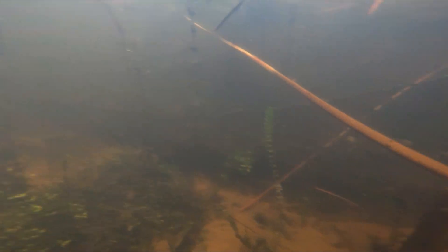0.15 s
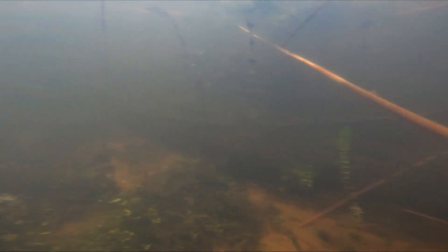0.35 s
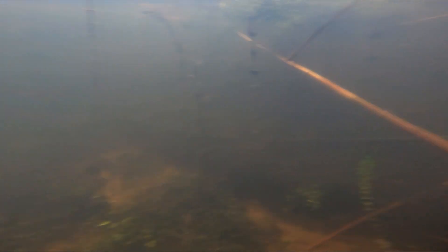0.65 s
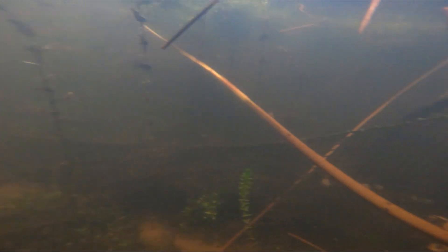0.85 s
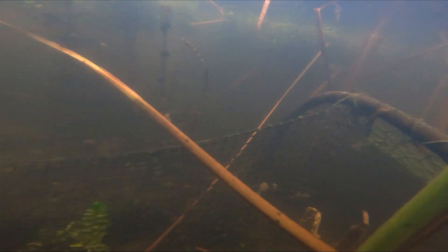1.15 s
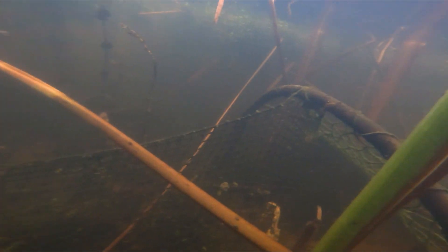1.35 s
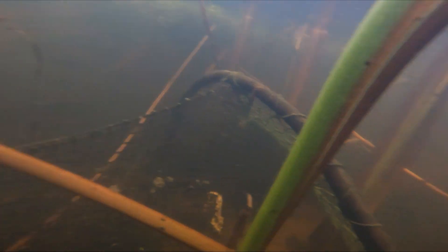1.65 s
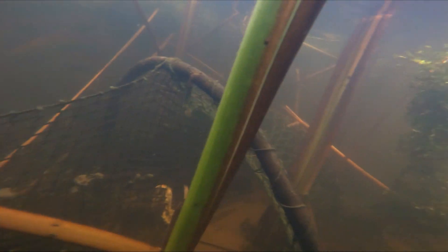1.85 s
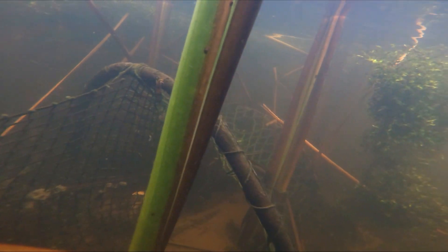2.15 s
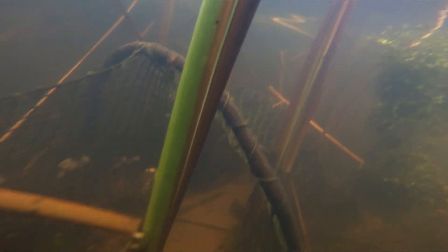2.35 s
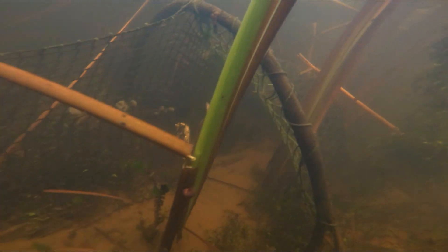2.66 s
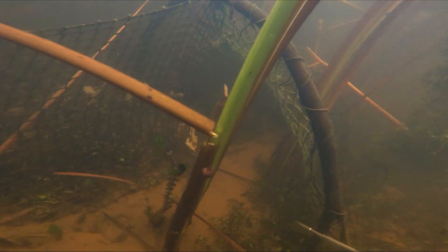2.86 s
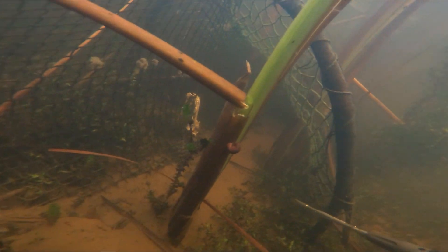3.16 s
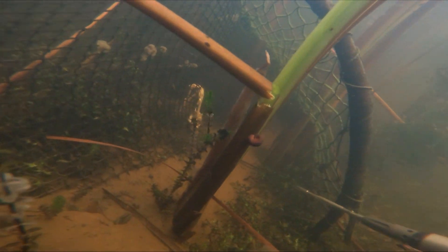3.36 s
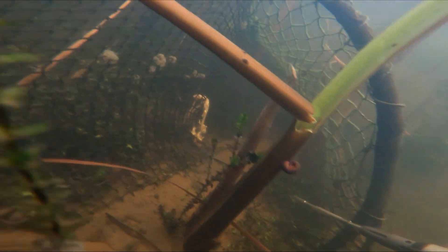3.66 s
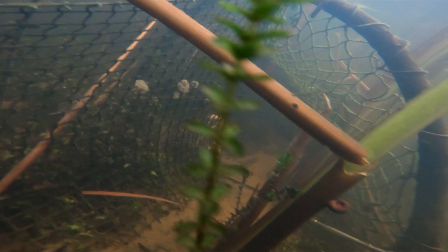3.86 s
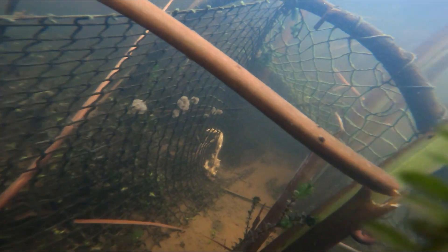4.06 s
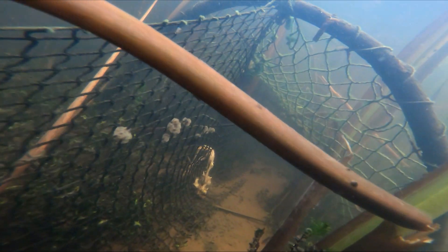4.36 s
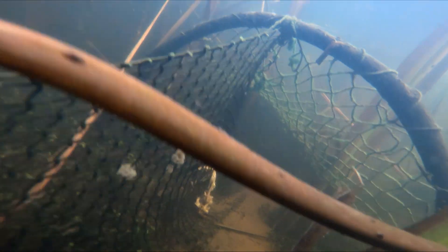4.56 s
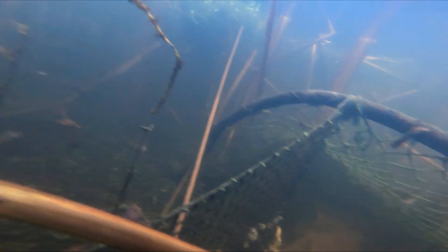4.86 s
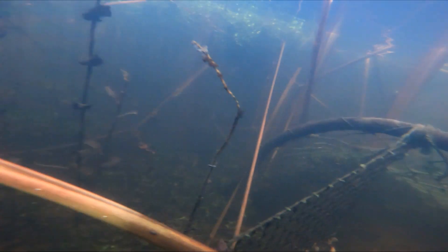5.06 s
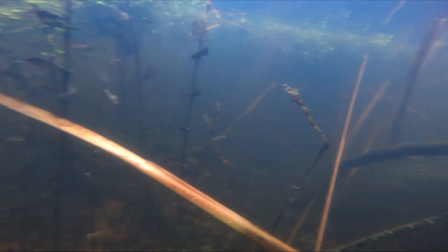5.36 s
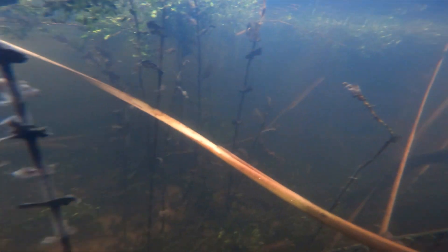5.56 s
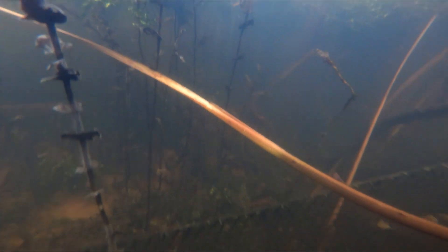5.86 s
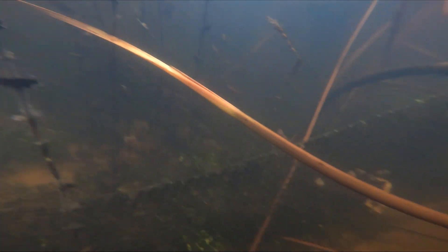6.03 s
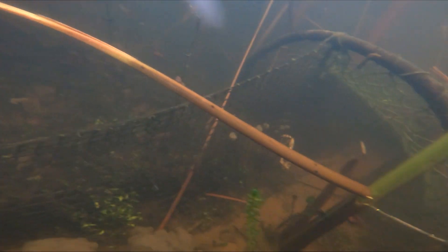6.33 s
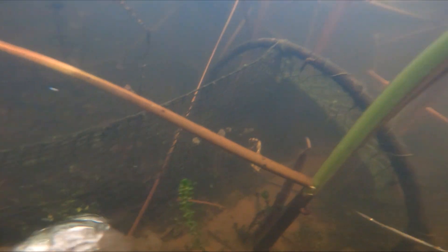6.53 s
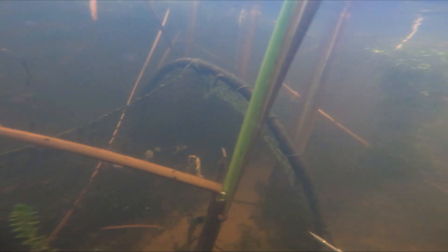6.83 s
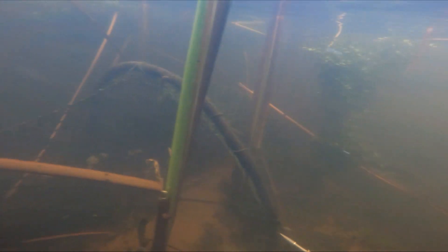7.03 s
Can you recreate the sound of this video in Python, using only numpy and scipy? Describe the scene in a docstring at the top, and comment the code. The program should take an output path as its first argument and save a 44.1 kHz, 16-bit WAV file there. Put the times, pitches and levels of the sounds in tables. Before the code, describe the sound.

Underwater, reeds knock dully and scrape against a sealed camera case while small bubbles ping and shallow water murmurs softly.

```python
"""Stems knock and scrape on a sealed camera housing as a diver carries it through reeds and branches.
The housing rings dully under each blow, and a dragged stem sticks and slips across it.
Around it, bubbles ping and gurgle while the shallow water hisses, heaves and murmurs.
Both microphones sit inside and hear the walls flex, in step in the bass, opposed near 1 kHz."""
import sys
import numpy as np
from scipy import signal
from scipy.fft import rfft, irfft, next_fast_len
from scipy.io import wavfile

SR = 44100
rng = np.random.default_rng(int(sys.argv[2]) if len(sys.argv) > 2 else 0)


def bounce(signal):
    """Save signal as a 16-bit WAV file at the path given by the first command-line argument."""
    frames = np.transpose(np.atleast_2d(signal))
    limited = np.clip(frames, -1, 1)
    pcm = np.round(limited * 32767).astype(np.int16)
    wavfile.write(sys.argv[1], SR, pcm)


N = 317079
TIME = np.arange(N) / SR
WALL_HZ = 3290   # the wall muffles what lies above

# The housing's modes. Each row: pitch in Hz, width in Hz, gain in dB under blows, gain in dB under flow.
HOUSING_MODES = [(608, 420, -7.5, -26.5), (724, 46.6, 6.5, -3), (1039, 126, 7, -9.5), (1310, 186, 6, 1),
                 (1780, 198, -4, -0.5), (2460, 240, -38, -17.5), (2920, 300, -18, -14),
                 (5210, 600, -46, -18), (7280, 480, -42, -27.5), (9600, 400, -65, -38.5)]
# Phase between the microphones. Each row: frequency in Hz, lead of the left in radians.
WALL_PHASE = [(0, -.2), (200, -.2), (480, -.4), (600, -.9), (700, -1.9), (800, -2.8), (900, -3.7),
              (1300, -4.0), (1650, -1.6), (2000, -.8), (2300, .3), (2900, 1.8), (3400, 1.5)]
# The side the walls favour. Each row: frequency in Hz, left over right in dB.
WALL_BALANCE = [(450, 0), (620, 5.5), (800, -10), (1050, -2), (1400, 7), (1700, -2.5), (2900, 0.5),
                (4000, 1)]
# Microphone noise. Each row: frequency in Hz, relative density in dB.
MIC_NOISE_SPECTRUM = [(50, -20.5), (105, -15), (170, -2), (260, -10), (450, -23), (1000, -13.5),
                      (2000, -22), (3200, -29.5), (4200, -34.5), (6000, -35), (10000, -41), (12000, -55.5),
                      (15500, -69)]
# Water streaming past. Each row: time in seconds, hiss level in dB, fizz level in dB.
STREAM_LEVELS = [(0, -68.5, -80.5), (.17, -62.5, -74.5), (.35, -66.5, -87), (1.4, -65, -91),
                 (2.4, -63, -82), (3.6, -62.5, -87), (4.05, -60.5, -79.5), (4.6, -62.5, -80),
                 (5.8, -61, -82.5), (6.45, -68, -92.5), (6.9, -63.5, -86.5), (7.19, -57, -78)]
# The murmur's tone. Each row: pitch in Hz, width in Hz, gain in dB.
MURMUR_MODES = [(158.8, 26.6, -0.5), (220, 56.6, 3.5), (273, 192, -3)]
# The murmur's fader. Each row: time in seconds, level in dB.
MURMUR_LEVELS = [(0, -66), (.85, -57), (1.4, -61), (1.5, -91), (2.6, -57.5), (3.6, -82.5), (4.05, -70),
                 (4.6, -87), (4.75, -65), (5.2, -66), (5.8, -59), (6.45, -66), (6.9, -55), (7.19, -58)]
# Slow surges of water. Each row: crest time in seconds, level in dB, half length in seconds.
WATER_SURGES = [(0, -54.5, 0.25), (0.834, -49, .45), (1.851, -48.5, 0.41), (2.745, -49, 0.31),
                (3.234, -52, 0.16), (3.941, -58, 1), (4.489, -66, 0.21), (4.826, -41.5, 0.16),
                (5.38, -32.5, 0.08), (5.551, -50, 0.41), (5.94, -56, 0.3), (6.645, -57, 0.46),
                (7.02, -39.5, .08)]
# Bubble clouds. Each row: crest time in seconds, level in dB, fade in dB per second.
BUBBLE_CLOUDS = [(1.347, -51.5, 311), (2.45, -50.5, 298), (2.56, -31, 522), (2.668, -29.5, 267),
                 (2.75, -57, 51.5), (5.79, -76.5, 16.5), (6.058, -61, 100.5)]
# Single bubbles. Each row: start in seconds, level in dB, pitch in Hz, seconds to fade by 60 dB.
BUBBLE_PINGS = [(0.639, -62, 2220, 0.055), (1.009, -49, 1840, 0.056), (1.055, -48, 1720, 0.041),
                (1.116, -58, 3210, 0.026), (1.385, -63, 421, 0.32), (1.62, -45, 1210, 0.059),
                (1.876, -43.5, 414, 0.16), (2.017, -61, 380.5, 0.68), (2.124, -48.5, 405, 0.18),
                (2.15, -49, 3210, 0.019), (2.182, -58, 403, 0.26), (2.239, -40, 1774, 0.027),
                (2.239, -59.5, 870, 0.22), (2.4, -46.5, 414, 0.085), (2.664, -16.5, 650.7, .11),
                (2.718, -34, 1177, 0.15), (2.747, -36, 1780, 0.012), (2.748, -41.5, 403, 0.22),
                (2.813, -51, 1244, 0.18), (2.928, -58, 3100, .03), (2.97, -58.5, 587, 0.25),
                (3.31, -39.5, 1310, 0.078), (3.312, -41.5, 1583, 0.039), (3.936, -43, 1955, 0.046),
                (3.87, -60.5, 793, 0.21), (3.94, -56, 567, 0.2), (4.025, -50, 2510, 0.032),
                (4.084, -44.5, 2240, 0.034), (4.1, -55.5, 765, 0.059), (4.091, -55, 321, 0.14),
                (4.22, -64, 697, 0.23), (4.474, -52, 1440, 0.12), (4.473, -54.5, 775, 0.18),
                (4.559, -65.5, 356, 0.11), (4.981, -46, 2730, .018), (5.346, -29.5, 583, 0.15),
                (5.576, -25.5, 622, 0.049), (5.642, -27.5, 623, 0.064), (5.702, -25.5, 600, 0.13),
                (5.906, -40.5, 694, 0.16), (5.936, -43, 1100, 0.29), (5.976, -45.5, 577, 0.19),
                (5.976, -38.5, 976, 0.29), (5.985, -44, 2020, 0.034), (6.126, -11.5, 1876, 0.058),
                (6.129, -49, 268.8, 0.57), (6.13, -43, 727, .14), (6.43, -57.5, 837, 0.096),
                (6.556, -41, 930, 0.11), (6.622, -37.5, 876, 0.11), (6.648, -48, 253.7, 0.88),
                (6.83, -56, 677, 0.29), (6.977, -34, 1220, 0.1), (7.0, -37.5, 1676, 0.063),
                (7.003, -33, 2920, 0.047), (7.037, -44.5, 1955, 0.076), (7.062, -41.5, 1900, .013),
                (7.095, -51, 3290, .02), (7.129, -39.5, 1760, 0.063), (7.134, -36, 2615, 0.028)]
# Where single bubbles are panned. Each row: pitch in Hz, left over right in dB.
BUBBLE_PAN = [(400, -1.5), (620, 0.5), (740, -8.5), (950, 6), (1200, -1), (1500, 15.5), (1900, -1),
              (2900, 5)]
# Soft bumps. Each row: start in seconds, level in dB, pitch in Hz, seconds to fade by 60 dB.
BODY_BUMPS = [(0.047, -46.5, 250, 0.017), (0.079, -45.5, 312, 0.03), (0.825, -44.5, 244, 0.11),
              (0.832, -49.5, 96.3, 0.18), (2.569, -39, 147.3, .15), (2.666, -25, 217, 0.022),
              (3.099, -42, 154.5, 0.043), (3.433, -54, 195, .05), (3.741, -42, 112.6, 0.019),
              (3.934, -48.5, 240, 0.018), (5.016, -41.5, 207.6, .073), (5.057, -43, 201, 0.076),
              (5.297, -15, 140.7, 0.062), (5.301, -15, 206, 0.068), (5.31, -15, 64.8, 0.083),
              (5.345, -24, 131.4, 0.085), (5.405, -21, 57.1, 0.17), (5.456, -22, 183.6, 0.025),
              (5.578, -33, 234, 0.013), (5.937, -45, 273.4, 0.2), (6.972, -36.5, 135, 0.09),
              (6.975, -32, 244, .1), (6.977, -33, 51.9, .11)]
# Tiny snaps. Each row: start in seconds, level in dB, pitch in Hz.
BRIGHT_SNAPS = [(0.7795, -49, 5150), (1.344, -53, 5320), (1.8745, -35, 5520), (1.8834, -34, 6700),
                (2.316, -64, 7300), (2.38, -62.5, 7540), (3.269, -50, 7460), (3.284, -64, 7500),
                (3.397, -55, 9660), (3.41, -61, 8150), (3.4361, -49.5, 5540), (3.474, -50, 5260),
                (3.763, -47.5, 5540), (3.7949, -48.5, 4880), (3.8503, -45, 5700), (3.8776, -57, 6060),
                (3.8943, -41.5, 5530), (3.932, -58, 6600), (4.248, -53.5, 6150), (4.995, -50, 5030),
                (5.232, -56, 8240), (5.3, -39, 3450), (5.3867, -34.5, 7500), (5.391, -24.5, 12300),
                (5.4107, -38.5, 8460), (5.489, -50, 5350), (5.548, -54, 5360), (5.8601, -66, 5100),
                (6.0077, -58, 5070), (6.066, -48, 11070), (6.0746, -49, 5140), (7.0344, -52, 7100),
                (7.0734, -58, 5400)]
# The singing rub's fader. Each row: time in seconds, level in dB.
RUB_LEVELS = [(6.55, -72), (6.598, -50.5), (6.794, -47.5), (7.19, -50)]
# The tones it sings. Each row: pitch in Hz, width in Hz, gain in dB.
RUB_MODES = [(258, 15, -0.5), (671, 40, -7), (842, 270, -13), (1070, 167, -8.5), (1320, 29, -4.5),
             (1934, 11, -12.5)]
# Two strokes of a stem, a list each. Each row: time in seconds, drag level in dB, rasp level in dB.
SCRAPE_STROKES = [
    [(5.27, -62.5, -92), (5.295, -34, -71), (5.31, -31, -71), (5.33, -39, -57), (5.35, -30, -50),
     (5.38, -24, -45), (5.395, -23, -46), (5.41, -28, -61), (5.425, -34.5, -66), (5.45, -42, -58),
     (5.462, -33, -68), (5.475, -47, -100)],
    [(5.475, -59.5, -108), (5.49, -24.5, -63), (5.52, -32.5, -60.5), (5.65, -33.5, -56), (5.7, -32.5, -60),
     (5.74, -32.5, -53.5), (5.76, -46.5, -65), (5.775, -52, -87), (5.86, -54, -100)],
]
# Colour of the strokes. Each row: grit over rasp in dB, its growth in dB per second,
# shudder over drag in dB, its growth in dB per second.
SCRAPE_COLOURS = [(-9.5, -25, -5, -32), (-31.5, 40.5, -10, -32.5)]
# The scrape's grit. Each row: frequency in Hz, relative density in dB.
GRIT_SPECTRUM = [(4000, -47), (4800, 7.5), (6500, -1), (7800, 4), (9500, 1.5), (10700, -45), (11600, -8),
                 (14500, -9)]
# Stems striking. Each row: start in seconds, level in dB, contact pitch in Hz, hardness in dB.
STEM_KNOCKS = [(0.78, -42, 1850, 17), (0.82, -8, 1780, -12), (0.848, -12, 1156, 12), (1.342, -29, 1230, 11),
               (1.371, -41.5, 760, -4), (1.873, -33, 1780, 33), (1.884, -39.5, 550, 12),
               (2.4, -32, 1680, 2), (2.432, -12.5, 980, -9.5), (2.48, -9, 1010, -14),
               (2.548, -10.5, 1890, -20), (2.575, -7, 1186, -14.5), (2.584, -22.5, 1240, -16),
               (2.663, -28.5, 646, -22), (2.727, -26, 1130, -19), (3.081, -33.5, 1060, -13),
               (3.092, -7, 1197, -29), (3.434, -42.5, 1950, 6), (3.81, -41, 1680, -14),
               (3.936, -34, 1940, 29), (4.084, -33, 2270, 22), (4.738, -39.5, 1070, 0),
               (5.3, -8.5, 590, -11.5), (5.347, -20.5, 588, -5.5), (5.386, -11.5, 1204, -3),
               (5.457, -19, 526, -18), (5.491, -13, 1190, 1), (5.506, -21.5, 1354, 1.5),
               (5.574, -34, 630, 14.5), (5.591, -31.5, 580, 9), (5.61, -19, 1250, -17),
               (5.667, -27, 1045, -6.5), (5.703, -18.5, 608, -20), (5.727, -31.5, 566, -16),
               (5.782, -38.5, 674, 0.5), (5.934, -19.5, 1230, -31), (6.073, -36.5, 1810, 15),
               (6.124, -28, 1860, -14), (6.555, -40, 940, -24), (6.974, -27, 1310, -1)]


def amp(db):
    """dB to gain."""
    return 10 ** (np.asarray(db) / 20)


def rms_one(x):
    """Scale to rms 1."""
    return x / np.sqrt(np.mean(x ** 2) + 1e-20)


def faders(rows, outside=None):
    """One curve per column, drawn through timed breakpoints."""
    times, *columns = np.transpose(rows)
    return [np.interp(TIME, times, column, outside, outside) for column in columns]


def drift(per_s):
    """A random wander, roughly between -1 and 1."""
    knots = rng.standard_normal(200 * N // SR)
    return np.interp(TIME * per_s, np.arange(len(knots)), knots)


def swells(crests, db, rise, fall):
    """Sum of swells that climb to a crest and fall away, in dB per second."""
    since = TIME - crests[:, None]
    lost_db = np.maximum(-since * np.reshape(rise, (-1, 1)), since * np.reshape(fall, (-1, 1)))
    return amp(db[:, None] - lost_db).sum(axis=0)


def steep(x, hz, kind):
    """Fourth-order low- or high-pass."""
    return signal.sosfilt(signal.butter(4, hz, kind, fs=SR, output="sos"), x)


def resonance(x, hz, width_hz):
    """Two-pole resonance, gain 1 on top."""
    r = np.exp(-np.pi * width_hz / SR)
    poles = [1, -2 * r * np.cos(2 * np.pi * hz / SR), r * r]
    return signal.lfilter(np.array([1, 0, -1]) * (1 - r * r) / 2, poles, x + 1e-18)


def modes(x, table):
    """Parallel resonances with alternating signs."""
    return sum((-1) ** k * amp(db) * resonance(x, hz, width) for k, (hz, width, db) in enumerate(table))


def coloured(spectrum):
    """Stereo noise with a given spectrum, rms 1."""
    hz = np.fft.rfftfreq(N, 1 / SR) + 1
    knots_hz, db = np.transpose(spectrum)
    gain = amp(np.interp(np.log(hz), np.log(knots_hz), db))
    return rms_one(irfft(rfft(rng.standard_normal((2, N))) * gain, N))


def grains(per_s, spread_db):
    """Random impulses of uneven size and sign."""
    sizes = amp(spread_db * np.minimum(rng.exponential(1, N), 4)) * rng.choice([-1, 1], N)
    return sizes * (rng.random(N) < per_s / SR)


def add(out, start, sound, pan_db=0):
    """Mix a short sound into both sides; positive pan is left."""
    i = round(start * SR)
    out[:, i:i + sound.shape[-1]] += sound[..., :N - i] * amp([[pan_db / 2], [-pan_db / 2]])


def ping(hz, t60, rise_cycles, wobble_db, sag=0):
    """A damped sine that wavers in level and drops by the fraction sag in pitch over t60."""
    t = np.arange(int((1.3 * t60 + .02) * SR)) / SR
    shape = (1 - np.exp(-t * hz / rise_cycles)) ** 2 * amp(-60 * t / t60)
    waver_db = np.interp(t / .006, np.arange(80), wobble_db * rng.standard_normal(80))
    waver = amp(waver_db * np.minimum(t / .015, 1))
    return shape / shape.max() * waver * np.sin(2 * np.pi * hz * (t - sag * t * t / t60 / 2))


def bubble_swarm(births, pitches, ring_q, soften_q):
    """Each impulse rings as a bubble at one of the pitches, picked at random."""
    picks = rng.integers(0, len(pitches), N)
    return sum(resonance(resonance(births * (picks == k), hz, hz / ring_q), hz, hz / soften_q)
               for k, hz in enumerate(pitches))


def stream_hiss():
    """Streaming water pushes unevenly on the housing, whose modes colour the hiss."""
    push = rng.standard_normal(N) * amp(2 * drift(25)) + 2 * grains(300, 3)
    hiss = modes(push, [(hz, width, db) for hz, width, _, db in HOUSING_MODES[:7]])
    hiss_db, _ = faders(STREAM_LEVELS)
    return amp(hiss_db) * rms_one(steep(steep(hiss, WALL_HZ, "low"), 674, "high"))


def water_murmur():
    """A low, fluttering band of water noise."""
    churn = (rng.standard_normal(N) + 0.67 * rng.standard_normal((2, N))) * amp(3.6 * drift(36))
    murmur = steep(steep(modes(churn, MURMUR_MODES), 130, "high"), 194, "low")
    return amp(faders(MURMUR_LEVELS)[0]) * rms_one(murmur)


def water_heave():
    """Sub-bass rumble that swells and ebbs with each surge."""
    push = rng.standard_normal(N) * amp(6 * drift(24))
    rumble = steep(resonance(push, 17, 21), 55, "low") * amp(1.7 * drift(7))
    crests, db, half_s = np.transpose(WATER_SURGES)
    slope = 18 / half_s   # 18 dB down at one half length from the crest
    return swells(crests, db, slope, slope) * rms_one(rumble)


def stream_fizz():
    """In the flow, each treble mode of the housing sputters in brief puffs of its own."""
    fizz = 0
    for hz, width, _, db in HOUSING_MODES[7:]:
        puffs = 1 + 1.6 * signal.lfilter([1], [1, -np.exp(-1 / (.004 * SR))], np.abs(grains(25, 4)))
        sputter = puffs * rng.standard_normal(N) + 0.97 * rng.standard_normal((2, N))
        fizz += amp(db) * resonance(sputter, hz, width)
    _, fizz_db = faders(STREAM_LEVELS)
    return amp(fizz_db + 2 * drift(11)) * rms_one(steep(fizz, 3200, "high"))


def stray_bubbles():
    """Sparse small bubbles ride just under the hiss."""
    blips = bubble_swarm(grains(53, 2.7), np.geomspace(350, 2000, 16), ring_q=20, soften_q=6)
    hiss_db, _ = faders(STREAM_LEVELS)
    return 0.32 * amp(hiss_db) * rms_one(steep(blips, 3600, "low"))


def gurgle():
    """Dense clouds of small bubbles, shaken loose by knocks, ring across two octaves."""
    cloud = bubble_swarm(grains(180, 2.76), np.geomspace(330, 1350, 14), ring_q=12, soften_q=4)
    crests, db, fade = np.transpose(BUBBLE_CLOUDS)
    return swells(crests, db, rise=1123.5, fall=fade) * rms_one(steep(cloud, 1800, "low"))


def bubbles():
    """Each single bubble is one damped ring; the middle-sized ones sag in pitch."""
    out = np.zeros((2, N))
    for start, db, hz, t60 in BUBBLE_PINGS:
        ring = ping(hz, t60, rise_cycles=0.91, wobble_db=4, sag=.085 if 1100 < hz < 2200 else 0)
        add(out, start, amp(db) * ring, pan_db=np.interp(hz, *np.transpose(BUBBLE_PAN)))
    return out


def bumps():
    """The body bumps softly against stems and bed, each time with one low, damped ring."""
    out = np.zeros((2, N))
    for start, db, hz, t60 in BODY_BUMPS:
        add(out, start, amp(db) * ping(hz, t60, rise_cycles=0.36, wobble_db=1.2))
    return out


def snaps():
    """Tiny noise bursts ring brightly, a little to the right."""
    out = np.zeros((2, N))
    decay = np.exp(-np.arange(600) / SR / .0025)
    for start, db, hz in BRIGHT_SNAPS:
        crack = rng.standard_normal((2, len(decay)))
        burst = (crack[0] + .9 * crack) * decay   # partly unlike in the two microphones
        ring = resonance(resonance(burst, hz, 500), hz, 1200)
        snap = steep(ring + 0.099 * resonance(burst, 4400, 4000), 2400, "high")
        add(out, start, amp(db) * steep(snap, 9900, "low") / np.abs(snap).max(), pan_db=-4.5)
    return out


def singing_rub():
    """A slow rub sings in a few narrow tones."""
    friction = rng.standard_normal(N) * amp(5.3 * drift(30))
    tones = steep(modes(friction, RUB_MODES), 2300, "low")
    return amp(faders(RUB_LEVELS, outside=-150)[0]) * rms_one(tones)


def stroke_gains():
    """Drag stands for pressure and rasp for speed; grit rides on the rasp, shudder on the drag."""
    gains = 0
    for rows, (grit_db, grit_growth, shudder_db, shudder_growth) in zip(SCRAPE_STROKES, SCRAPE_COLOURS):
        drag_db, rasp_db = faders(rows, outside=-150)
        since = np.clip(TIME - rows[0][0], 0, 1)
        gains += amp([drag_db, rasp_db, rasp_db + grit_db + grit_growth * since,
                      drag_db + shudder_db + shudder_growth * since])
    return gains


def stem_scrape():
    """A stem sticks and slips: low modes drag, upper ones rasp, with grit above and shudder below."""
    slips = grains(1500, 4) * amp(4.5 * drift(70))
    dark_modes = [(hz, width, db - 5.3 * np.log2(hz / 1200)) for hz, width, db, _ in HOUSING_MODES[:5]]
    drag = rms_one(steep(modes(slips, dark_modes), 2000, "low"))
    friction = rms_one(slips) + 1.4 * rng.standard_normal((2, N))
    rasp = resonance(friction, 2900, 400) + resonance(friction, 3800, 600)
    rasp = steep(steep(rasp, 4300, "low"), 4300, "low")
    rasp = rms_one(steep(rasp, 2500, "high"))
    grit = coloured(GRIT_SPECTRUM) * amp(4.5 * drift(80))
    shudder = rms_one(steep(resonance(rng.standard_normal(N), 160, 220), 400, "low"))
    drag_gain, rasp_gain, grit_gain, shudder_gain = stroke_gains()
    return drag_gain * drag + rasp_gain * rasp + grit_gain * grit + shudder_gain * shudder


def stem_knocks():
    """A click and faint rattle ring the contact, which shakes the housing; hard hits add a crack."""
    out, t = np.zeros((2, N)), np.arange(SR // 8) / SR
    rattle_decay = 0.2 * np.exp(-t / 0.0025) + 0.0062 * np.exp(-t / 0.017)
    for start, db, hz, hard_db in STEM_KNOCKS:
        force = rng.standard_normal(len(t)) * rattle_decay
        force[0] = 1   # the click
        tone = 9.9 * resonance(force, hz, hz / 3.74)
        crack = 5.5 * resonance(resonance(force, 2444, 700), 2450, 1900)
        edge = amp(-23) * force
        contact = tone + amp(hard_db) * (crack + edge)
        ring = modes(contact, [mode[:3] for mode in HOUSING_MODES[:7]]) + 0.085 * contact
        dull = steep(steep(ring, WALL_HZ, "low"), 0.72 * WALL_HZ, "low")
        tick = 0.0046 * resonance(force, 5200, 2500)   # a trace of treble passes the wall
        add(out, start, amp(db) * (steep(dull, 0.28 * hz, "high") / np.abs(dull).max() + tick))
    return out


def scene():
    """The mix passes through the flexing walls, which turn left and right apart in phase and level."""
    hits = stem_knocks() + bubbles() + bumps() + snaps()
    water = stream_hiss() + water_murmur() + water_heave() + stream_fizz() + stray_bubbles() + gurgle()
    mix = hits + water + stem_scrape() + singing_rub()
    size = next_fast_len(N + 4096)
    hz = np.fft.rfftfreq(size, 1 / SR)
    lead = np.interp(hz, *np.transpose(WALL_PHASE))
    balance_db = np.interp(hz, *np.transpose(WALL_BALANCE))
    balance_db *= np.clip((hz - 250) / 250, 0, 1)   # the bass stays centred
    left = amp(balance_db / 2) * np.exp(.5j * lead)
    return irfft(rfft(mix, size) * [left, 1 / left], size)[:, :N]


def record(dry):
    """Each microphone adds its own noise; the top end is cut."""
    noisy = dry + amp(-70) * coloured(MIC_NOISE_SPECTRUM)
    return signal.sosfilt(signal.cheby2(12, 70, 15700, fs=SR, output="sos"), noisy)


dry = scene()
out = record(dry)
bounce(out)
```